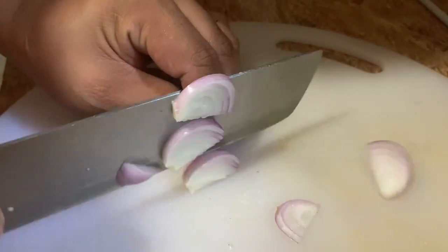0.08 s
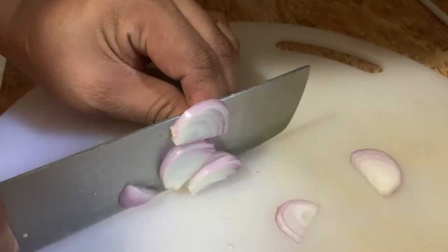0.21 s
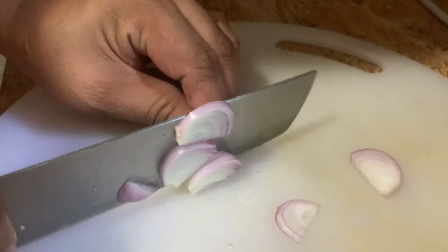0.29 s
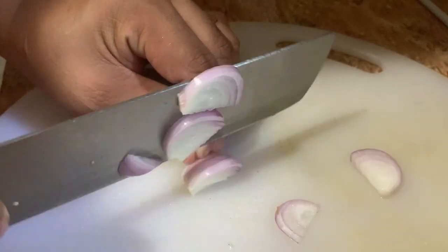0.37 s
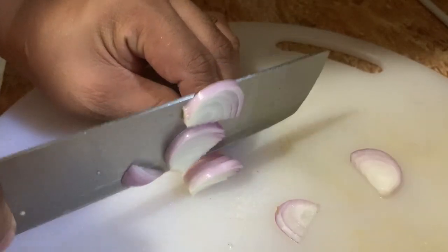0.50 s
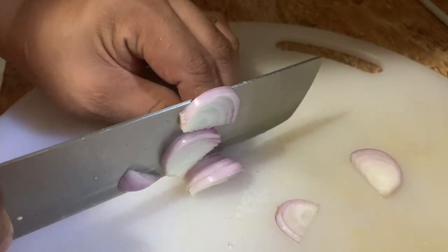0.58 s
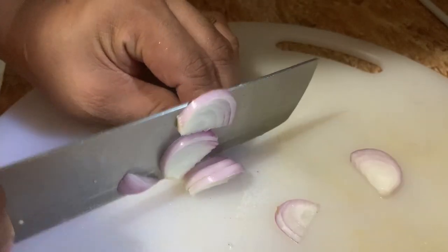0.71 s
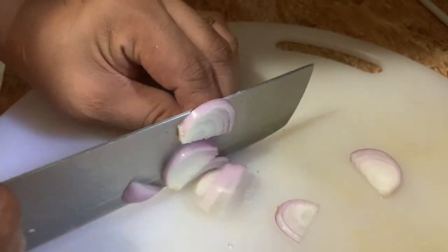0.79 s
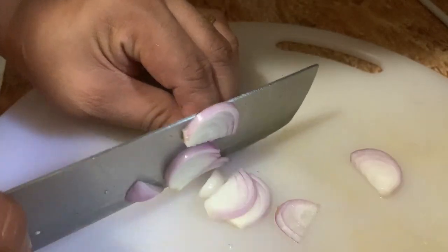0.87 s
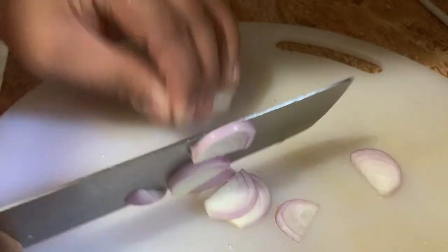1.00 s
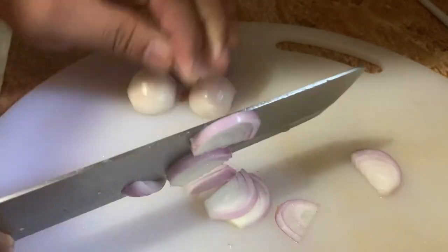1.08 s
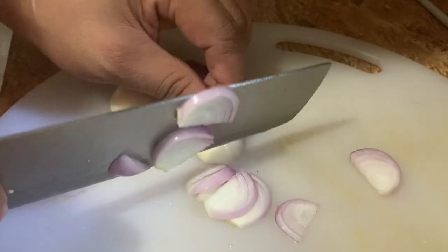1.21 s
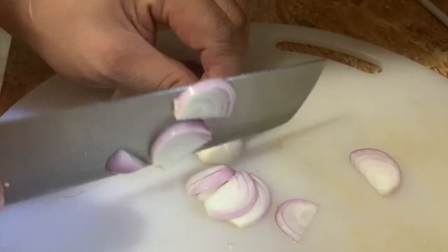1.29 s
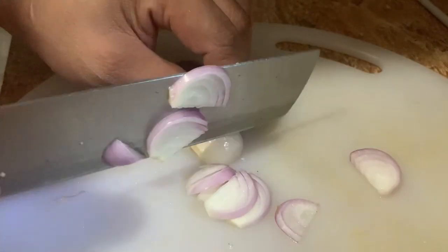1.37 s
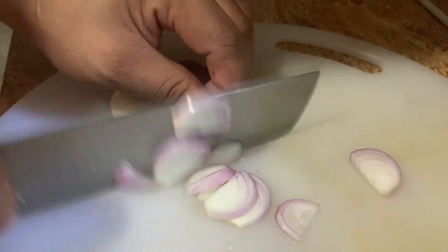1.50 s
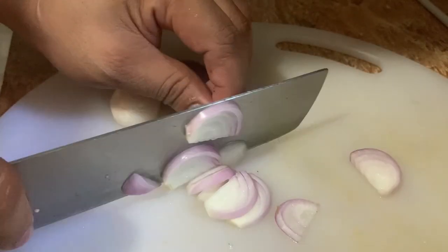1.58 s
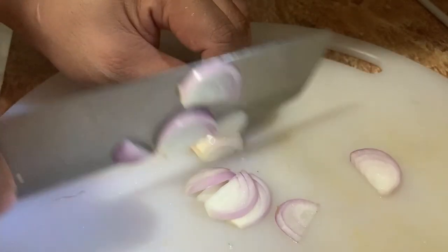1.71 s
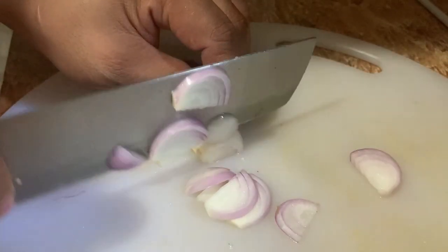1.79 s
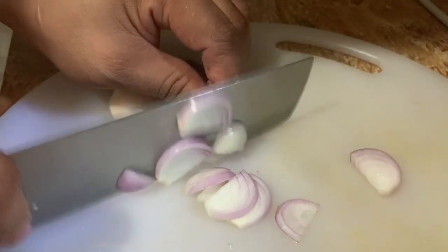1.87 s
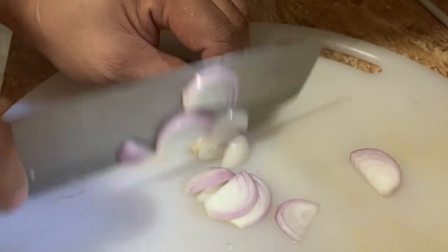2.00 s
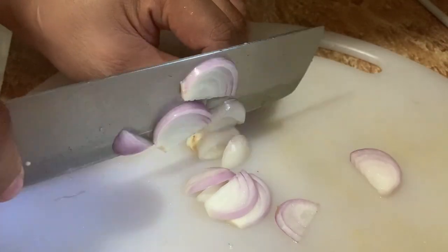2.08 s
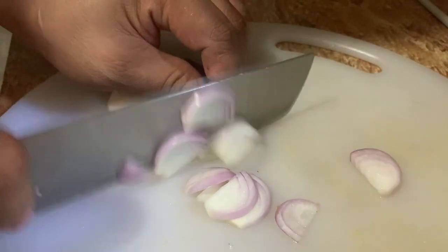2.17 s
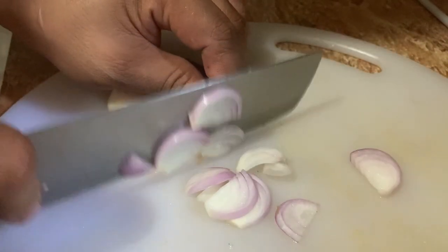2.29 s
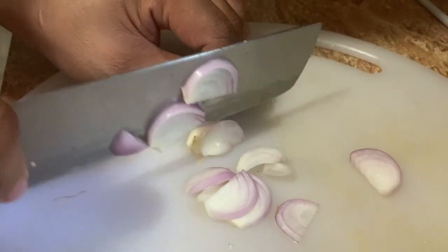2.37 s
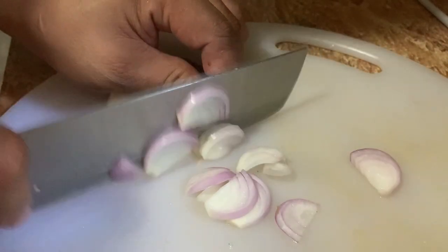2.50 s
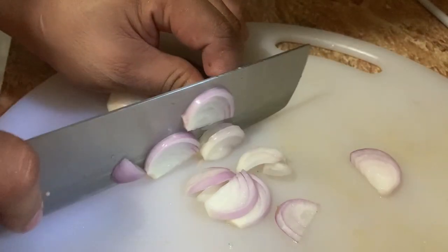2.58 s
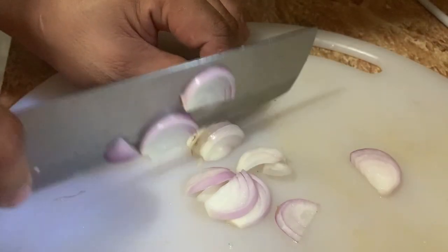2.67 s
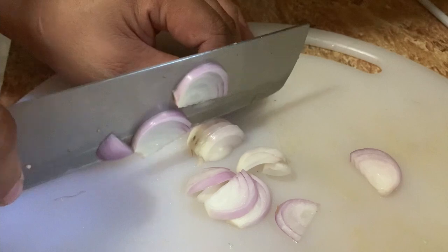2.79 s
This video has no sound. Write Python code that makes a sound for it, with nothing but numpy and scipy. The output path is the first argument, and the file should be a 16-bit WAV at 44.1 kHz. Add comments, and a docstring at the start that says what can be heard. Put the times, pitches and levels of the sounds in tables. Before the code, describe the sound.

A large knife slices onion, each crisp wet crunch ending in a sharp knock on plastic board

```python
"""A large knife slices onion on a plastic board, close to a phone with two microphone ports.
Over room tone and a low distant rumble come small wet ticks and rustles, decaying or swelling noise.
Each stroke then crunches, as dense random bursts of cells; light taps lead to knocks that excite the modes of
board and blade, the board's bending waves bringing the highs first. A noisy crack sounds with each knock,
then a soft rebound and the kitchen's echo; between knocks the sliding blade squeaks, a narrow band of noise."""
import sys
import numpy as np
from scipy import signal
from scipy.fft import rfft, irfft, next_fast_len
from scipy.io import wavfile
from scipy.ndimage import uniform_filter1d

SR = 44100
rng = np.random.default_rng(int(sys.argv[2]) if len(sys.argv) > 2 else 0)


def materialize(psi):
    """Save the field psi as 16-bit PCM at rate SR to the path in sys.argv[1].

    A 1-D psi becomes a single channel; in a 2-D psi each row is a channel.
    """
    bounded = np.clip(np.atleast_2d(psi).T, -1, 1)
    quanta = np.round(bounded * 32767).astype(np.int16)
    wavfile.write(sys.argv[1], SR, quanta)


def undo_db(level):
    """Turn decibels back into plain size, where 20 dB means ten times bigger."""
    steps = np.asarray(level, float) / 20
    return 10 ** steps


N = 125685  # samples
M = next_fast_len(N + SR // 2)  # transform length, with room for tails
F = np.maximum(np.arange(M // 2 + 1) * SR / M, 1)  # frequency of each bin, Hz
T = np.arange(N) / SR  # time, s

# Knife edge meets the board. Each row: time in seconds, level in dB, contact in milliseconds.
KNOCKS = [(0.2159, -10.5, 0.084), (0.8253, -17.5, 0.33), (1.5669, -9.5, 0.49), (1.9355, -12, 0.17),
          (2.2348, -10.5, 0.26), (2.568, -13, 0.36)]
# Modes of the board. Each row: frequency in Hz, level in dB, t60 in seconds.
BOARD_MODES = [(207.5, -10, 0.04), (309, -6.5, 0.052), (347.3, -1.5, 0.064), (457.7, -1, 0.059),
               (497, -11, 0.077), (681, -4.5, 0.058), (784, 2, 0.024), (981, 5.5, 0.013), (1231, 1, 0.025),
               (1447, -8, 0.041), (1640, -13, 0.0083)]
# Modes of the blade. Each row: frequency in Hz, level in dB, t60 in seconds.
BLADE_MODES = [(1840, -8.5, 0.05), (2200, 0.5, 0.034), (2575, 4.5, 0.021), (2930, 4.5, 0.013),
               (3270, 9, 0.0091), (3693, -3, 0.024), (4180, 7, .007)]
MODE_COUNT = len(BOARD_MODES) + len(BLADE_MODES)


def on_hz(table):
    """Interpolates a table of (Hz, dB) rows along a logarithmic frequency axis."""
    hz, db = np.array(table, float).T
    return np.interp(np.log(F), np.log(np.maximum(hz, 1)), db)


def over_time(table):
    """Interpolates a table of (s, dB) rows in decibels and returns the linear gain."""
    return undo_db(np.interp(T, *np.array(table).T))


def unit(x):
    """Normalizes a signal to an rms of 1."""
    return x / np.sqrt(np.mean(x ** 2))


def decay(age, t60):
    """Exponential decay: the amplitude falls by 60 dB in t60 seconds."""
    return np.exp(-np.log(1000) * age / t60)


def filt(x, response):
    """Linear filtering: the spectrum is multiplied by a frequency response."""
    return irfft(rfft(x, M) * response, M)[..., :N]


def causal(db):
    """Minimum phase: folding the cepstrum of a gain curve makes its response causal."""
    cepstrum = irfft(db * np.log(10) / 20, M)
    cepstrum[1:M // 2] *= 2
    cepstrum[M // 2 + 1:] = 0
    return np.exp(rfft(cepstrum))


def walk(rate):
    """Slow random modulation of rms 1: random steps, rate per second, smoothed twice."""
    k = int(SR / rate)
    steps = np.repeat(rng.standard_normal(N // k + 1), k)
    return unit(uniform_filter1d(uniform_filter1d(steps, k), k)[:N])


def band(hz, deviation_hz):
    """Gaussian passband on a logarithmic frequency axis."""
    return np.exp(-.5 * (np.log(F / hz) * hz / deviation_hz) ** 2)


def ring(modes, mode_db, tune, rise=1):
    """Modal superposition: the spectrum of a sum of decaying sines, each offset in level and tuning."""
    t = np.arange(SR // 4) / SR
    total = 0
    for (hz, db, t60), offset_db, ratio in zip(modes, mode_db, tune):
        total = total + undo_db(db + offset_db) * decay(t, t60) * np.sin(2 * np.pi * hz * ratio * t) * rise
    return rfft(total, M)


def board(mode_db, tune):
    """Dispersion: bending waves delay the board's lows; the blade's modes swell just after the blow."""
    bend_s_sqrt_hz, first_hz = 0.0869, 1410
    blade_rise_s, low_cut_hz = 0.00067, 221.4
    split = len(BOARD_MODES)
    # phase whose group delay is bend * (1/sqrt(f) - 1/sqrt(first)), and zero above first_hz
    f = np.minimum(F, first_hz)
    bend = 2 * np.sqrt(f) - f / np.sqrt(first_hz)
    dispersion = np.exp(-2j * np.pi * bend_s_sqrt_hz * bend)
    plate = ring(BOARD_MODES, mode_db[:split], tune[:split]) * dispersion
    t = np.arange(SR // 4) / SR
    swell = (1 - np.exp(-t / blade_rise_s)) ** 2
    blade = ring(BLADE_MODES, mode_db[split:], tune[split:], swell)
    return (plate + blade) / np.sqrt(1 + (low_cut_hz / F) ** 6)


def blows(rows):
    """Impact excitation: a short push drives the modes; a longer contact takes away more treble."""
    mode_scatter_db, port_scatter_db = 2, 2.5
    detune = .02  # share by which hand and onion shift each mode from blow to blow
    out = 0
    for s, db, ms in rows:
        both, own, shift = rng.standard_normal((3, MODE_COUNT))
        delay = np.exp(-2j * np.pi * F * s)
        push = delay / (1 + 2j * np.pi * F * ms / 4000) ** 2  # two lags of a quarter contact each
        heard = [board(mode_scatter_db * both + port_scatter_db * side * own, 1 + detune * shift)
                 for side in (1, -1)]
        out = out - undo_db(db) * push * np.array(heard)
    return out


def knocks():
    """Impacts of the edge, lighter taps as the blade breaks through, and the board dropping back softly."""
    # Lighter taps. Each row: time in seconds, level in dB, contact in milliseconds.
    light_taps = [(0.161, -48, 0.44), (0.197, -32.5, 0.17), (0.811, -38, 0.19), (1.0813, -39, 1.6),
                  (1.546, -40, 0.13), (1.842, -38, 0.043), (1.888, -37.5, 0.63), (1.918, -32.5, 0.52),
                  (2.179, -42, 0.07), (2.209, -32, 0.061), (2.221, -24.5, 0.13), (2.502, -41.5, 0.038),
                  (2.532, -39, 0.063), (2.551, -35, 0.16), (2.829, -37, 3.3)]
    rebound_s, rebound_db, rebound_ms = .046, -25, 0.81  # delay, level relative to the knock, contact
    rebounds = [(s + rebound_s, db + rebound_db, rebound_ms) for s, db, ms in KNOCKS]
    return blows(KNOCKS + light_taps + rebounds)


def cracks():
    """Band-limited noise with exponential decay: the edge cracks as it lands, below the knock in level."""
    crack_db, crack_t60_s, crack_hz = -23, .035, 3800
    env = 0
    for s, db, ms in KNOCKS:
        env = env + undo_db(db + crack_db) * (T >= s) * decay(np.abs(T - s), crack_t60_s)
    return rfft(env * rng.standard_normal(N), M) * band(crack_hz, crack_hz / 2)


def crackle():
    """Random point process: dense bursting cells over a wet hiss, with larger resonant pops, at rms 1."""
    grains_per_s, grain_spread_db, grain_t60_s = 1700, 1.5, 0.0074
    hiss_db, flicker_db = -3, 2.5
    # Larger cells burst, each in one band. Each entry: band centre in Hz.
    pop_bands = [2164, 4380, 6200, 10390, 14060]
    pops_per_s, pop_db = 300, -4.5  # rate in each band, level of all pops together
    bursts = (rng.random(N) < grains_per_s / SR) * undo_db(grain_spread_db * rng.exponential(size=N))
    t = np.arange(512) / SR
    power = np.convolve(bursts ** 2, decay(t, grain_t60_s) ** 2)[:N]
    power = power / power.mean() + undo_db(2 * hiss_db)  # doubled dB, as this is power
    fine = unit(np.sqrt(power) * undo_db(flicker_db * walk(120)) * rng.standard_normal(N))
    big = 0
    for hz in pop_bands:
        clicks = (rng.random(N) < pops_per_s / SR) * (rng.random(N) - .5)
        resonance = np.sqrt(1e4 / hz) / (1 + 4j * (F / hz - hz / F)) ** 2  # two stages with a Q of 4
        big = big + filt(clicks, resonance)
    return unit(fine + undo_db(pop_db) * unit(big))


def crunch_gain():
    """Amplitude envelope: the blade's crunch and rustle on the onion, interpolated in decibels."""
    # One list of rows per stretch of crunch or faint rustle. Each row: time in seconds, level in dB.
    crunch_stretches = [
        [(0.085, -68.5), (0.165, -45), (0.179, -50), (0.205, -26.5), (0.215, -28), (0.227, -40), (0.265, -62),
         (0.333, -68.5), (0.393, -61), (0.42, -82)],
        [(0.61, -86), (0.625, -52), (0.652, -78), (0.684, -51.5), (0.702, -68), (0.76, -42), (0.82, -28.5),
         (0.838, -40.5), (0.844, -45), (0.864, -48), (0.96, -89)],
        [(0.98, -76), (1.0, -61), (1.018, -59), (1.03, -64), (1.042, -72), (1.07, -82.5), (1.082, -68),
         (1.092, -77), (1.13, -79)],
        [(1.19, -83), (1.208, -66.5), (1.226, -57.5), (1.254, -81), (1.26, -84)],
        [(1.48, -83), (1.49, -56.5), (1.532, -34.5), (1.568, -26), (1.578, -40), (1.654, -69), (1.688, -60),
         (1.7, -86)],
        [(1.83, -72), (1.844, -45), (1.858, -48), (1.888, -39), (1.916, -26.5), (1.932, -28), (1.968, -61.5),
         (2.056, -62), (2.072, -48.5), (2.1, -76)],
        [(2.155, -99), (2.165, -58), (2.179, -49), (2.206, -34), (2.213, -29.5), (2.235, -26.5), (2.259, -51.5),
         (2.359, -82), (2.407, -54.5), (2.42, -48.5), (2.437, -73.5), (2.46, -79)],
        [(2.49, -76), (2.5, -47), (2.564, -23.5), (2.58, -44.5), (2.662, -71), (2.766, -73), (2.78, -44),
         (2.802, -94), (2.812, -60.5), (2.85, -56.5)],
    ]
    gain = np.zeros(N)
    for rows in crunch_stretches:
        s, db = np.array(rows, float).T
        gain = gain + undo_db(np.interp(T, s, db, left=-120, right=-120))
    return gain


def wet_ticks():
    """Transient noise: each wet tick starts at once and decays exponentially."""
    # Each row: time in seconds, level in dB, t60 in seconds.
    tick_rows = [(0.0297, -44, 0.042), (0.139, -50, 0.022), (.1595, -35.5, 0.052), (0.6206, -41.5, 0.025),
                 (0.7296, -48.5, 0.11), (0.807, -29, 0.056), (0.845, -21, 0.012), (0.894, -46, 0.019),
                 (1.021, -50, 0.0083), (1.0296, -41.5, 0.012), (1.0805, -51, 0.017), (1.5223, -34, 0.068),
                 (1.684, -53, .015), (1.8426, -29, 0.021), (1.887, -27.5, 0.064), (2.0188, -45, .012),
                 (2.0674, -36, 0.014), (2.1797, -35.5, 0.12), (2.209, -21, 0.0092), (2.4174, -32.5, 0.0083),
                 (2.502, -26.5, 0.043), (2.5306, -20.5, 0.023), (2.6917, -54.5, 0.014), (2.721, -51, 0.062),
                 (2.7742, -29.5, 0.014), (2.8138, -39.5, 0.023)]
    env = np.zeros(N)
    for s, db, t60 in tick_rows:
        env += undo_db(db) * (T >= s) * decay(np.abs(T - s), t60)
    return env * rng.standard_normal(N)


def onion():
    """Source and radiation: returns the airborne crunch and ticks, and the crunch that enters the board."""
    # Spectral colour of crunch and ticks as the phone records them, cut off above 16 kHz.
    # Each row: frequency in Hz, level in dB.
    heard_colour = [(500, -40.5), (1000, -1), (2300, -3), (3100, -9), (4490, -6.5), (7010, -5.5),
                    (8760, -5.5), (10900, -2.5), (13400, -4), (15000, -4), (15900, -9), (16300, -50),
                    (20000, -53)]
    # Weight below body_hz, fuller when the blade bites than when it brushes.
    # Each row: time in seconds, gain in dB.
    body_weight = [(0, -1), (.12, -8.5), (.16, -0.5), (.3, 6.5), (.4, -0.5), (.62, -7.5), (.76, -14),
                   (.795, -12), (.82, 2), (1.05, -1.5), (1.5, -2.5), (1.57, -5.5), (1.84, 7), (1.9, -1),
                   (2.07, -5), (2.2, 2), (2.42, 2.5), (2.52, 0), (2.7, -0.5), (2.85, -2)]
    body_hz = 7330
    spread_db = -5.5  # crunch unrelated between ports
    into_board_db = -39
    gain, grain = crunch_gain(), crackle()
    apart = undo_db(spread_db) * np.abs(grain) * rng.standard_normal((2, N))
    wet = gain * (grain + apart) + wet_ticks()
    body = filt(wet, 1 / (1 + (F / body_hz) ** 6))
    colour = causal(on_hz(heard_colour))
    colour = colour / np.sqrt(np.mean(np.abs(colour) ** 2))
    air = rfft(wet + (over_time(body_weight) - 1) * body, M) * colour
    shaking = rfft(gain * np.abs(grain) * rng.standard_normal(N), M)
    into = shaking * board(np.zeros(MODE_COUNT), np.ones(MODE_COUNT)) * undo_db(into_board_db)
    return air, into


def squeaks():
    """Narrow-band noise under half-sine envelopes: a breathy squeak as the wet blade slides."""
    # Each row: start in seconds, end in seconds, peak level in dB.
    squeak_rows = [(0.665, 0.703, -66), (0.728, 0.75, -58), (0.749, 0.792, -47.5), (1.514, 1.562, -41),
                   (2.764, 2.797, -56)]
    squeak_hz, width_hz = 4390, 710
    env = 0
    for start, end, db in squeak_rows:
        env = env + undo_db(db) * np.sin(np.pi * np.clip((T - start) / (end - start), 0, 1))
    breath = unit(filt(rng.standard_normal(N), band(squeak_hz, width_hz / 2)))
    return rfft(env * breath, M)


def ports(lead, balance):
    """Two-receiver cues: phase lead and level difference give the left and right responses to a source."""
    side = np.array([[.5], [-.5]])
    hz, radians = np.array(lead, float).T
    return undo_db(side * on_hz(balance)) * np.exp(1j * side * np.interp(F, hz, radians))


def room():
    """Diffuse reverberation: decaying noise in bands is the kitchen's echo, a different one at each port."""
    # Each row: band centre in Hz, level in dB, t60 in seconds.
    echo_bands = [(270, -15.5, 0.2), (455, -11, 0.32), (1072, -9, 0.21), (1763, -10, 0.26),
                  (3660, -8.5, 0.2), (8050, -17.5, 0.2), (13970, -20, .15)]
    rise_s = 0.00067
    tail = 0
    for hz, db, t60 in echo_bands:
        env = (1 - np.exp(-T / rise_s)) * decay(T, t60)
        env = env / np.sqrt(np.sum(env ** 2))
        tail = tail + undo_db(db) * env * filt(rng.standard_normal((2, N)), band(hz, hz * 0.37))
    return rfft(tail, M)


def room_tone():
    """Coherence of a diffuse field: noise whose bass is alike at both ports and whose treble differs."""
    # Spectrum of the tone. Each row: frequency in Hz, relative level in dB per Hz.
    tone_colour = [(15, -39), (33, -9), (50, -1), (123, 3), (190, -2), (270, -8), (405, -7.5), (476, -10),
                   (600, -14), (1260, -16), (2760, -27.5), (5730, -40.5), (8700, -49), (10500, -45),
                   (16000, -51), (16500, -75)]
    # Course of the tone. Each row: time in seconds, level in dB before a slow waver.
    tone_course = [(0.0, -54), (1.31, -50.5), (1.71, -47.5), (2.85, -46)]
    alike_hz, waver_db = 875, 0.77
    mid, side = rfft(rng.standard_normal((2, N)), M)
    wide = np.clip(0.2 + F / alike_hz, 0, 1)
    pair = mid + np.array([[1], [-1]]) * wide * side
    tone = unit(irfft(undo_db(on_hz(tone_colour)) * pair, M)[:, :N])
    return tone * over_time(tone_course) * undo_db(waver_db * walk(6.24))


def rumble():
    """Quadrature modulation: two slow noises on a wavering carrier make a narrow low rumble."""
    # Each row: time in seconds, level in dB, mean of the two ports.
    rumble_course = [(0.0, -55), (1.25, -54.5), (1.41, -49), (2.32, -51.5), (2.74, -50.5), (2.85, -43)]
    rumble_hz, width_hz, waver = 115.7, 42.5, 0.0597  # waver: rms share of the frequency
    lowpass = 1 / (1 + (F / (width_hz / 2)) ** 4)
    slow_cos, slow_sin = filt(rng.standard_normal((2, N)), lowpass)
    phase = 2 * np.pi * np.cumsum(rumble_hz * (1 + waver * walk(5.2))) / SR
    return unit(slow_cos * np.cos(phase) + slow_sin * np.sin(phase)) * over_time(rumble_course)


def hums():
    """Narrow-band noise: a few faint hums, each fading in over 23 ms."""
    # Each row: frequency in Hz, level in dB as the mean of the ports, width in Hz, start in seconds.
    hum_rows = [(48.9, -59, 23, 0), (255, -60, 6.7, 0.99), (346, -67.5, 31, 0), (486.6, -65, 14.5, 0)]
    total = 0
    for hz, db, width_hz, start in hum_rows:
        tone = unit(filt(rng.standard_normal(N), band(hz, width_hz / 2)))
        total = total + undo_db(db) * tone * np.clip((T - start) / 0.023, 0, 1)
    return total


def background():
    """Superposition of room tone with rumble and hums, the latter two 2 dB weaker at the left port."""
    balance = undo_db(np.array([[-1.0], [1.0]]))
    return room_tone() + (rumble() + hums()) * balance


def scene():
    """Superposition of direct sound and echo: board and onion reach both ports, over the background."""
    # Board between the ports. Each row: frequency in Hz, left's phase lead in radians.
    wood_lead = [(0, -1.5), (300, 0.48), (1030, 1.13), (2300, 1.51), (4500, 3.5), (16500, -4)]
    # Each row: frequency in Hz, left minus right in dB.
    wood_balance = [(200, -1), (380, 0), (700, 0), (1290, 7.5), (2380, -1.5), (4400, -3.5), (8120, 2),
                    (15000, 2)]
    # Onion between the ports. Each row: frequency in Hz, left's phase lead in radians.
    air_lead = [(0, 11), (860, 1.5), (1290, 2.2), (1810, 1), (2410, 4), (2670, 5), (3530, 4), (4480, 5.5),
                (5430, 4.5), (6800, 5), (9300, 2.5), (11500, -0.4), (12800, -2.5), (16500, -7)]
    # Each row: frequency in Hz, left minus right in dB.
    air_balance = [(700, 8), (1290, 1.5), (2380, 4), (4400, -4), (8120, 0.0), (15000, 0.0)]
    air, into = onion()
    air = air + squeaks() + cracks()
    wood = knocks() + into
    near = wood * ports(wood_lead, wood_balance) + air * ports(air_lead, air_balance)
    echo = (wood + air).mean(axis=0) * room()
    return irfft(near + echo, M)[:, :N] + background()


def roll_off(x):
    """The treble ends steeply here."""
    return signal.sosfilt(signal.butter(12, 17000, fs=SR, output="sos"), x)


def record(dry):
    """Soft saturation: the phone rounds the loudest peaks towards full scale."""
    return roll_off(np.tanh(dry))


dry = scene()
out = record(dry)
materialize(out)
```